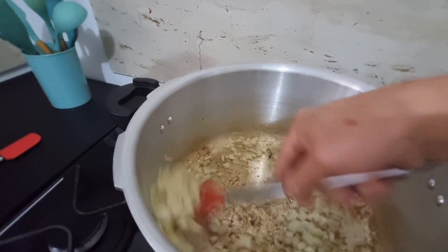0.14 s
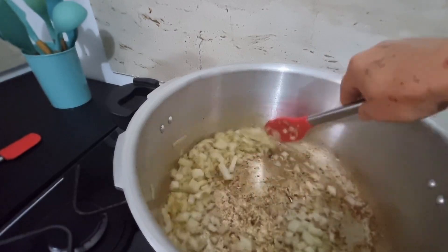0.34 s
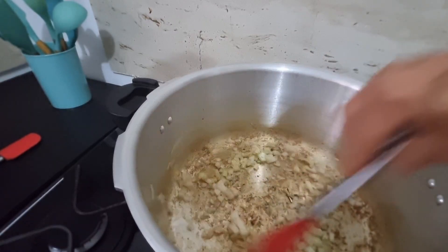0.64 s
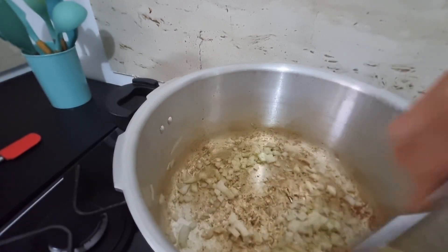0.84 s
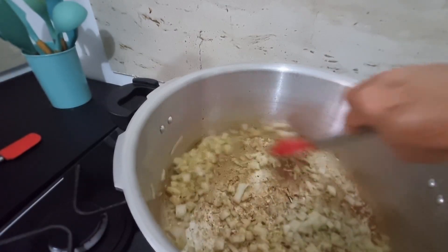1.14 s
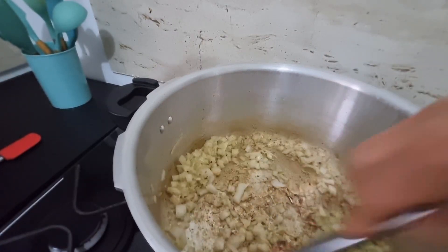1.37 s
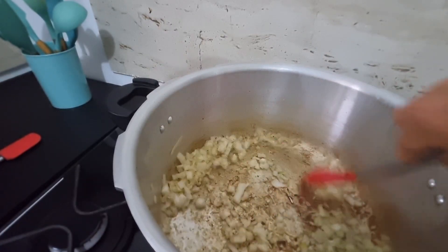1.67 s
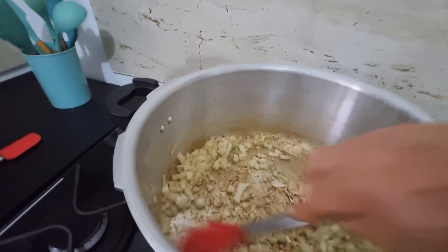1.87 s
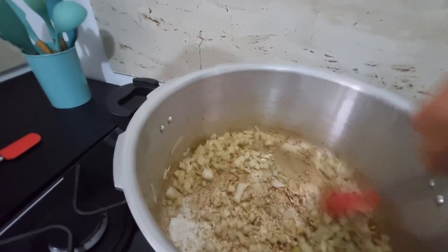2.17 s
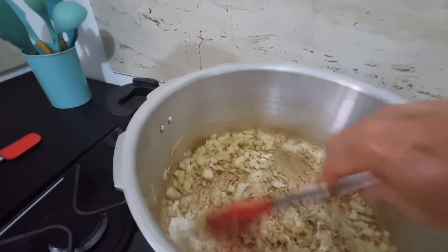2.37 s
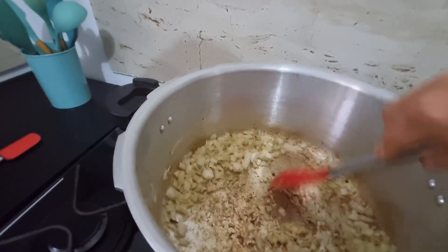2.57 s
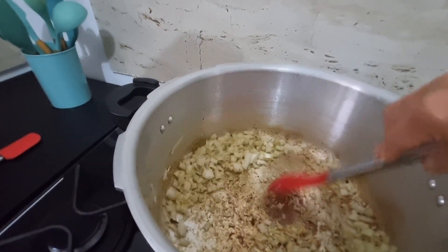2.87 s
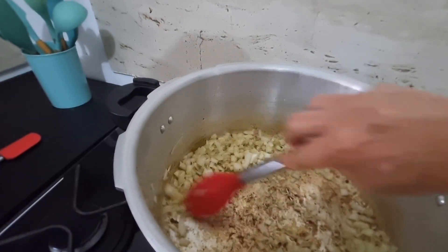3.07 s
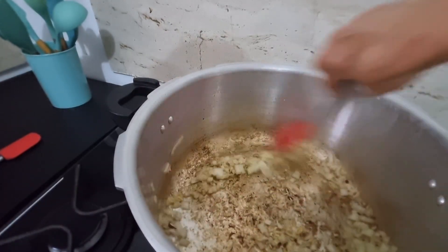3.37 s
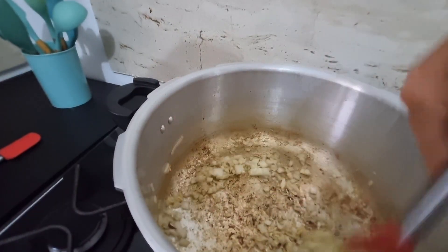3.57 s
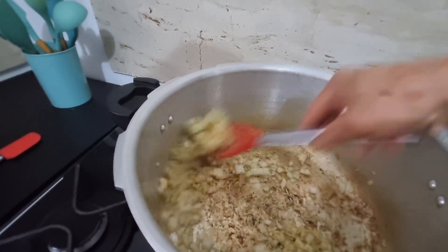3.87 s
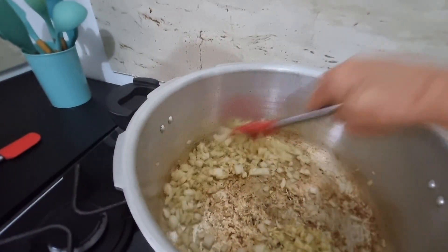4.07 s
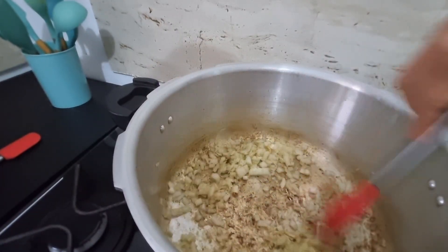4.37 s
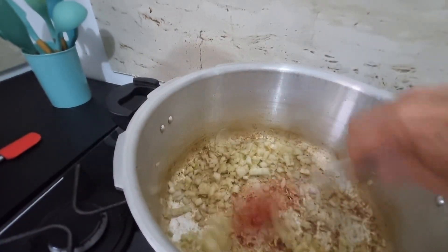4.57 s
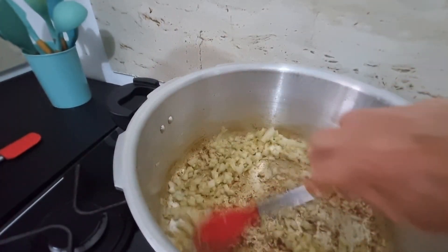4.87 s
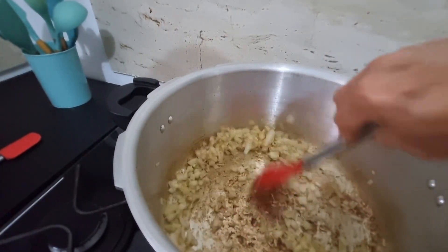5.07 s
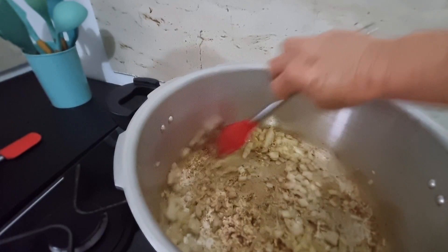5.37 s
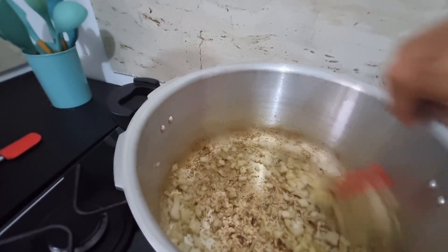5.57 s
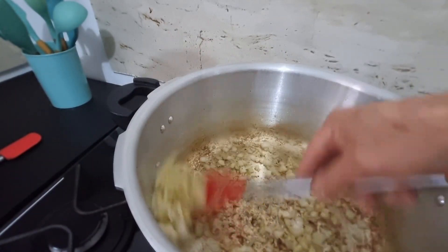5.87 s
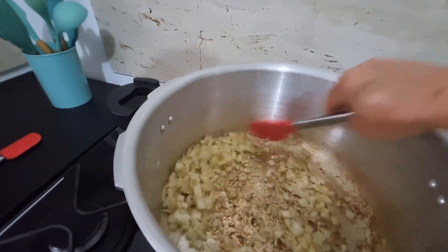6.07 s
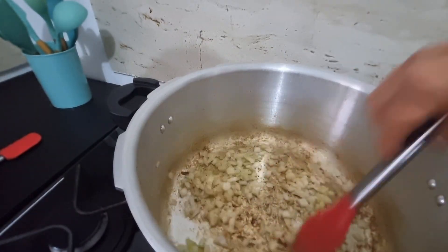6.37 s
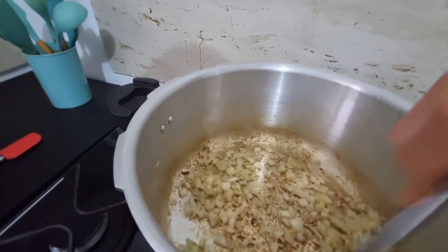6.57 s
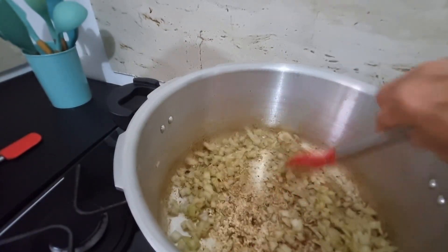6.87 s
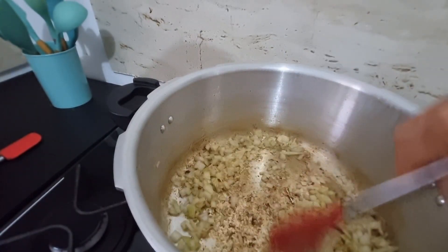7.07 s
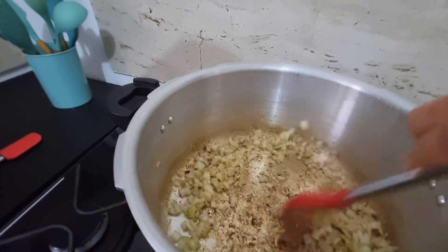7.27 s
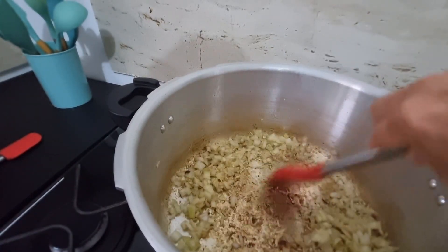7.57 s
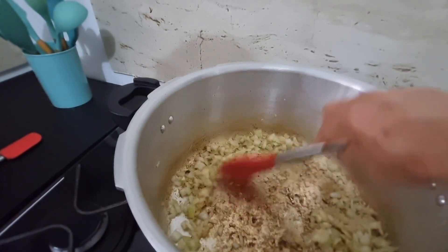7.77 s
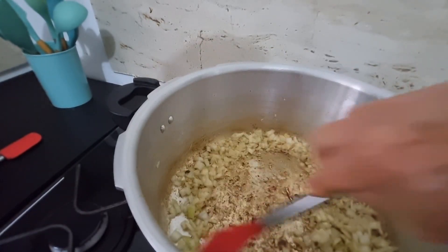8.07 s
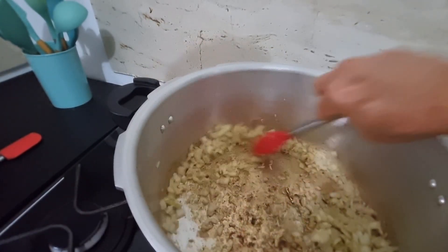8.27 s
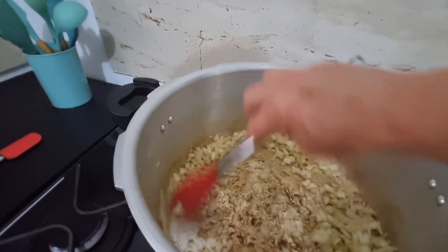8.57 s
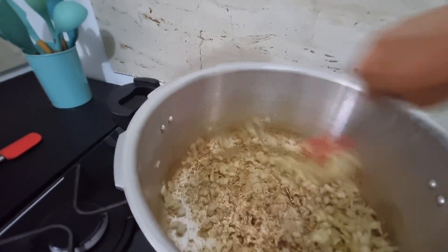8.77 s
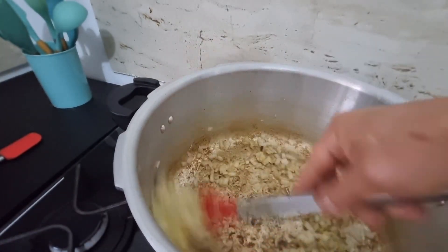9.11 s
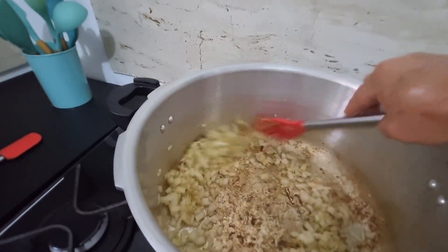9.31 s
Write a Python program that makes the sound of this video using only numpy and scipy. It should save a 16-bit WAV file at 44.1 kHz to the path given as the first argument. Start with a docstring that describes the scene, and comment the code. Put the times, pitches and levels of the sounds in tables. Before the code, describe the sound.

Chopped onion and garlic fry in hot oil in a wide metal pot, heard close up in a kitchen. The dense, bright hiss runs throughout and swells with each stroke of a soft spatula. Small sharp pops and faint plops of turned food dot the sizzle. The spatula rubs and lightly taps the pot in several short clusters, making it ring softly, while a low drone sits underneath.

```python
"""Chopped onion and garlic sizzle in hot oil in a wide aluminium pot, heard close up in stereo.
Countless steam bubbles burst into a dense hiss that swells with each stroke of a soft spatula.
Water drops pop and turned food plops. The pot hums in its own resonances, louder when the spatula
rubs or bumps it, and a low drone fills the kitchen."""
import sys
import numpy as np
from scipy import signal
from scipy.fft import rfft, irfft, next_fast_len
from scipy.io import wavfile
from scipy.ndimage import uniform_filter1d, map_coordinates

SR = 44100
rng = np.random.default_rng(int(sys.argv[2]) if len(sys.argv) > 2 else 0)


def transcribe(signal):
    """Save signal, clipped to [-1, 1], as a 16-bit WAV file at the path in sys.argv[1]."""
    frames = np.atleast_2d(signal).T
    limited = np.clip(frames, -1, 1)
    pcm = np.round(limited * 32767).astype(np.int16)
    wavfile.write(sys.argv[1], SR, pcm)


N = 416304
TIME_S = np.arange(N) / SR
TOP_HZ = 15800


def amp(db):
    """Gain of a level in dB."""
    return 10 ** (np.asarray(db) / 20)


def unit(x):
    """Scale so the mean of the channels has rms 1."""
    return x / np.sqrt(np.mean(np.atleast_2d(x).mean(0) ** 2) + 1e-20)


def along(points, hz):
    """Interpolate (Hz, value) points on a log axis."""
    point_hz, values = np.transpose(points)
    return np.interp(np.log(hz + 1), np.log(point_hz + 1), values)


def curves(rows):
    """One value per sample for each column after the time."""
    times_s, *columns = np.transpose(rows)
    return [np.interp(TIME_S, times_s, column) for column in columns]


def wobble(knots_per_s):
    """Smooth random curve, deviation about 1."""
    knots = rng.standard_normal(int(N * knots_per_s / SR) + 4)
    return map_coordinates(knots, [TIME_S * knots_per_s])


def filtered(x, response):
    """Apply a complex frequency response."""
    size = next_fast_len(N + SR // 2)
    return irfft(rfft(x, size) * response(np.fft.rfftfreq(size, 1 / SR)), size)[..., :N]


def panned(pan_db):
    """Stereo gains; pan is left over right."""
    return amp(np.vstack([pan_db / 2, -pan_db / 2]))


def mid_side(correlation):
    """Mid and side gains for a left-right correlation."""
    angle = np.arccos(np.clip(correlation, -1, 1)) / 2
    return np.array([np.cos(angle), np.sin(angle)])


def noise_pair(correlation):
    """Two correlated white noises."""
    mid, side = mid_side(correlation)[:, None] * rng.standard_normal((2, N))
    return np.array([mid + side, mid - side])


def bubbles(per_s, low_hz, high_hz, cycles, spread_db, samples):
    """Bursting bubbles: damped sines, most weak, a few strong."""
    when, pitch, size = np.hsplit(rng.random((int(per_s * N / SR), 3)), 3)
    t = np.arange(samples) / SR
    hz = low_hz * (high_hz / low_hz) ** pitch
    strength = amp(spread_db * np.minimum(-np.log(1 - size), 5))
    rings = strength * np.sqrt(hz) * np.sin(2 * np.pi * hz * t) * np.exp(-hz * t / cycles)
    index = (when * N).astype(int) + np.arange(samples)
    return unit(np.bincount(index.ravel(), rings.ravel(), N + samples)[:N])


# Each row: frequency in Hz, left-right correlation of the boiling.
BOIL_CORRELATION = [(1100, 0.34), (1500, 0.28), (1800, -0.23), (2050, -0.046), (2300, -0.16), (3300, -0.14),
                    (3800, -0.028), (6300, 0.1), (7200, -0.19), (8000, 0.04)]


def boiling():
    """Near bubbles on the hiss of far ones, fluttering in patches of time and frequency."""
    near = np.array([bubbles(5000, 1680, 13700, cycles=1.15, spread_db=2.5, samples=40) for _ in range(2)])
    wet = np.array([bubbles(500, 1474, 6045, cycles=15, spread_db=3, samples=260) for _ in range(2)])
    far = rng.standard_normal((2, N))
    spectra = signal.stft(far + amp(-11) * near + amp(-16.5) * wet, nperseg=512)[2]
    patches = uniform_filter1d(rng.standard_normal(spectra.shape), 12, axis=1)
    patches = uniform_filter1d(patches, 9, axis=2)
    patchy = signal.istft(spectra * amp(1.05 * patches / patches.std()), nperseg=512)[1][:, :N]
    mid, side = filtered(patchy, lambda hz: mid_side(along(BOIL_CORRELATION, hz)))
    flutter_db = 0.13 * wobble(14) + 0.33 * wobble(45)
    return np.array([mid + side, mid - side]) * amp(flutter_db)


# Sizzle spectrum per side. Each row: frequency in Hz, relative density in dB.
LEFT_SPECTRUM = [(900, -41.5), (1300, -19), (2400, -18.5), (3100, -13.5), (4200, -7.5), (6000, -4.5),
                 (7300, -1.5), (8300, -7.5), (9300, -5), (10800, -3), (12000, 1.5), (14000, 1),
                 (15700, 0.5)]
RIGHT_SPECTRUM = [(900, -33.5), (1300, -20.5), (2500, -16), (3800, -7.5), (5300, -2), (6100, -3.5),
                  (7500, 4.5), (7900, 5.5), (8700, -1), (10800, 5), (11700, 2), (12800, 7), (15700, 8.5)]
# Air resonances in the pot. Each row: centre in Hz, width in Hz, lift in dB.
AIR_MODES = [(1305, 22, 9.5), (1820, 79, 2), (2180, 94, 2.5), (2590, 150, 1.5), (3110, 130, 2)]


def sizzle_colour(hz):
    """Stereo gain of the sizzle, lifted where the air in the pot resonates."""
    lift_db = sum(db / (1 + (2 * (hz - centre) / width) ** 2) for centre, width, db in AIR_MODES)
    return amp([along(LEFT_SPECTRUM, hz) + lift_db, along(RIGHT_SPECTRUM, hz) + lift_db]) * (hz < TOP_HZ)


# Strokes turn the food. Each row: time in seconds, fizz level in dB, fine steam level in dB.
STROKES = [(0.0, -30, -32.5), (0.23, -31, -32.5), (0.29, -25.5, -30), (0.37, -24.5, -30), (0.52, -28, -33),
           (0.66, -32.5, -32), (1.02, -31, -32), (1.18, -27, -27), (1.45, -30.5, -33.5),
           (1.68, -28.5, -29.5), (2.02, -29, -33), (2.16, -25.5, -27.5), (2.34, -29, -33.5),
           (2.5, -28, -30), (3.1, -29.5, -33), (3.21, -30, -32), (3.39, -25, -29.5), (3.84, -32, -33.5),
           (4.05, -25.5, -30), (4.55, -29.5, -32.5), (4.73, -26, -28), (4.89, -29, -31.5),
           (5.12, -26, -29.5), (5.23, -29, -31.5), (5.52, -27, -29), (5.86, -34, -34.5), (6.05, -28, -32.5),
           (6.52, -32.5, -30), (6.7, -31.5, -35), (6.78, -28.5, -29.5), (7.28, -28, -30),
           (7.39, -29.5, -32), (7.54, -29, -30), (7.76, -31.5, -34), (7.86, -26.5, -30), (8.15, -31.5, -34),
           (8.31, -27.5, -31.5), (8.57, -29.5, -31.5), (8.75, -26.5, -28.5), (8.88, -29, -31.5),
           (9.18, -34.5, -34), (9.44, -26.5, -30.5)]


def stroke_swell_db():
    """Swell of the fizz about its mean as the food is turned."""
    fizz_db = curves(STROKES)[0]
    return fizz_db - fizz_db.mean()


# Slow drift. Each row: time in seconds, large bubbles over fizz in dB, pan in dB (mean is removed).
DRIFT = [(0, -8, -8), (.35, -10.5, -8), (.9, -10, -8), (1.5, -11.5, -6), (2.0, -10.5, -7), (2.5, -10, -7),
         (3.1, -12, -5.5), (3.4, -10.5, -6), (3.7, -10, -6), (4.1, -11, -8), (4.7, -9.5, -5.5),
         (5.4, -10, -6.5), (6.1, -10, -7.5), (6.8, -10, -7.5), (7.1, -10, -6.5), (7.9, -11.5, -6),
         (8.3, -11, -7), (9.0, -9.5, -7), (9.44, -13, -8)]
# Wet food meets hot metal, large bubbles surge. Each row: peak time in seconds, lift in dB.
SURGES = [(.03, 2), (.55, 4.5), (3.39, 2.5), (3.56, 2.5), (4.57, 2.5), (5.47, 2.5), (6.26, 2.5), (7.39, 1),
          (8.76, 1)]
SURGE_HALF_S, LARGE_SWELL_SHARE, PAN_PER_SWELL = 0.052, 0.54, -0.096


def sizzle():
    """Water boils out of the food in three bands: large bubbles low, fizz above, fine steam on top."""
    fizz_db, steam_db = curves(STROKES)
    offset_db, pan_db = curves(DRIFT)
    swell_db = stroke_swell_db()
    large_db = fizz_db + offset_db + (LARGE_SWELL_SHARE - 1) * swell_db + 0.96 * wobble(6)
    large_db += sum(db * np.exp(-((TIME_S - s) / SURGE_HALF_S) ** 2) for s, db in SURGES)
    pan_db += PAN_PER_SWELL * swell_db + 0.5 * wobble(4)
    boil = boiling()
    lowpass = lambda hz, edge_hz: 1 / (1 + (hz / edge_hz) ** 8)
    large = filtered(boil, lambda hz: sizzle_colour(hz) * lowpass(hz, 4064))
    fizz = filtered(boil, lambda hz: sizzle_colour(hz) * (lowpass(hz, 9310) - lowpass(hz, 4400)))
    steam = filtered(boil, lambda hz: sizzle_colour(hz) * (1 - lowpass(hz, 11600)))
    bands = amp(large_db) * unit(large) + amp(fizz_db) * unit(fizz) + amp(steam_db) * unit(steam)
    return bands * panned(pan_db - pan_db.mean())


# Each row: peak time in seconds, level in dB, pitch in Hz, pan in dB.
WATER_POPS = [(.929, -17, 9000, 4), (1.291, -11, 9000, 2), (1.384, -16, 8000, -2), (3.186, -28, 8000, -5),
              (4.078, -13, 8000, 5), (4.464, -18, 8000, -10), (4.5656, -16.5, 3200, -10),
              (6.035, -19, 8000, 4), (6.596, -24, 8000, -10), (6.775, -27, 2200, 0), (7.858, -13, 8000, -6),
              (8.742, -16, 7600, -12)]


def pops():
    """Water drops burst in the oil: a few cycles at a pitch set by bubble size."""
    out, t = np.zeros((2, N + SR)), np.arange(-40, 120) / SR
    for s, db, hz, pan_db in WATER_POPS:
        width_cycles = np.where(t < 0, .5, 1.7)
        crack = np.sin(2 * np.pi * (hz * t + rng.random())) * np.exp(-(hz * t / width_cycles) ** 2)
        out[:, round(s * SR) - 40:][:, :len(t)] += amp(db) * panned(pan_db) * crack
    return out[:, :N]


# Each row: peak time in seconds, level in dB.
FOOD_PLOPS = [(0.297, -45), (0.491, -39), (1.453, -37), (1.705, -43), (2.725, -38), (3.009, -39),
              (3.07, -41), (3.317, -36), (3.45, -42), (5.633, -41), (5.85, -37), (5.878, -41), (5.938, -37),
              (6.202, -39), (6.585, -38), (7.344, -43.9), (7.616, -42), (7.878, -40), (8.395, -40),
              (8.802, -38), (8.957, -41), (9.386, -40)]
FAINT_PLOP_COUNT, FAINT_PLOP_DB = 20, -53


def plops():
    """Turned food lands, each plop one soft low cycle; faint ones fall at random."""
    out, t = np.zeros(N + SR), np.arange(-400, 400) / SR
    faint = [(0.14 + when * (N / SR - .2), FAINT_PLOP_DB + 6 * (size - .5))
             for when, size in rng.random((FAINT_PLOP_COUNT, 2))]
    for s, db in FOOD_PLOPS + faint:
        hz = 230 * np.exp(0.17 * rng.standard_normal())
        envelope = amp(db - 11.5 * (t / 0.0031) ** 2)
        out[round(s * SR) - 400:][:len(t)] += envelope * np.sin(2 * np.pi * hz * t)
    return np.array([out[:N] * amp(1.2), np.roll(out[:N], 30)])  # left is louder and earlier


# Spatula on the pot floor. Each row: the two bounds of a span in seconds.
CONTACT_SPANS = [(1.05, 1.4), (3.29, 3.8), (6.282, 6.7), (8.66, 8.1)]
CATCH_PER_S, CATCH_DB, CATCH_HZ, CATCH_S = 10, -41, 414, 0.013


def spatula_catches():
    """The spatula catches faintly at random, at least once a span; returns rows like DRAGS."""
    rows = []
    for start_s, end_s in CONTACT_SPANS:
        count = max(1, round(CATCH_PER_S * (end_s - start_s)))
        for when, force, pitch, rise in rng.random((8, 4))[:count]:
            rows.append((start_s + (end_s - start_s) * when, CATCH_DB + 5 * (force - .5),
                         CATCH_HZ + 20 * (pitch - .5), CATCH_S * (.5 + rise), CATCH_S))
    return rows


# Each row: peak time in seconds, level in dB, pitch in Hz, rise and fall in seconds.
DRAGS = [(0.389, -40, 423, 0.0068, 0.0063), (1.34, -35, 430, .008, .011), (1.838, -39, 422, 0.0066, .007),
         (1.952, -41, 420, .014, 0.013), (2.398, -41, 423, .013, .007), (2.462, -29, 408, 0.025, .011),
         (2.491, -28.5, 413, 0.008, 0.016), (2.549, -38, 424, 0.012, 0.015),
         (2.651, -31.5, 422, .007, 0.021), (2.699, -28, 430, 0.0039, 0.0096),
         (2.791, -32.5, 405, 0.013, .008), (2.833, -32.5, 408, .012, .019), (2.965, -41, 414, .028, .008),
         (2.989, -32.5, 423, .008, .013), (3.563, -41, 410, .01, 0.013), (4.28, -38, 422, 0.0089, .013),
         (4.334, -38, 424, .012, 0.018), (4.624, -22.5, 410, 0.0081, 0.012),
         (4.665, -30.5, 405, 0.0098, 0.025), (4.775, -32, 414, 0.012, 0.0062),
         (4.803, -29, 413, .009, 0.01), (4.825, -28.5, 414, 0.0055, .013), (4.87, -35.5, 421, .009, 0.033),
         (5.02, -41, 417, .053, .044), (5.147, -41.5, 423, 0.0088, .015), (5.19, -39.5, 422, .012, 0.014),
         (5.226, -41, 406, .006, .009), (5.422, -36.5, 418, 0.021, 0.0055),
         (6.417, -38.5, 422, 0.0074, .009), (6.721, -37.5, 426, .011, 0.013),
         (6.785, -33, 427, 0.015, 0.007), (6.81, -34.5, 409, .01, 0.022), (7.003, -25, 420, .021, 0.011),
         (7.056, -38, 413, 0.0088, 0.018), (7.17, -26.5, 421, 0.031, 0.041),
         (7.291, -36.4, 424, 0.0097, 0.011), (7.345, -24, 415, 0.0036, 0.015),
         (7.485, -34, 428, 0.0079, .01), (7.51, -35, 420, 0.0076, .008), (7.651, -28, 420, .007, .014),
         (7.7, -29.5, 420, 0.0067, 0.018), (7.787, -34, 403, 0.015, 0.034), (8.016, -37, 422, .014, .011),
         (8.051, -32, 423, 0.013, 0.009), (8.09, -35, 422, .01, .013), (8.429, -41, 415, 0.017, 0.013),
         (8.71, -38, 410, 0.017, .009)]


def spatula_drags():
    """Drags on the pot floor swell a low mode; returns the sound and the rubbing envelope."""
    out, pressure = np.zeros((2, N + SR)), np.zeros(N + SR)
    t = np.arange(-SR // 8, SR // 8) / SR
    for s, db, hz, rise_s, fall_s in DRAGS + spatula_catches():
        envelope = amp(db - 5.1 * (t / np.where(t < 0, rise_s, fall_s)) ** 2)
        phase = rng.random()
        lead = 0.046 * rng.standard_normal() * np.array([[1], [-1]])  # contact moves around the pot
        start = round(s * SR) - SR // 8
        out[:, start:][:, :len(t)] += envelope * np.sin(2 * np.pi * (hz * t + phase + lead))
        pressure[start:][:len(t)] += envelope
    slip = amp(wobble(60))  # rubber slips unevenly on metal
    rubbing = uniform_filter1d(pressure[:N], size=2500)  # starts before a drag and outlasts it
    return out[:, :N] * slip * panned(5.4), rubbing


# Pot resonances. Each row: centre in Hz, width in Hz, relative gain in dB.
POT_LOW_MODES = [(222.6, 9.1, -12.5), (337.3, 22, -8.5), (408.3, 30.5, -1.5), (431.4, 32, -2),
                 (469, 49, -10), (585, 17.7, -11.5), (688, 48, -16.5)]
POT_HIGH_MODES = [(767, 49, 1.2), (857.5, 58, 9.9), (897, 54, 8.7), (1006, 54, 1.5)]
# Hum of the high modes. Each row: time in seconds, base level in dB.
HIGH_HUM = [(0, -56), (.9, -55.5), (1.5, -52.5), (2.3, -55), (3.0, -61), (3.6, -58.5), (4.8, -56.5),
            (5.6, -54.5), (6.5, -58), (7.4, -55), (8.1, -56.5), (8.8, -53.5), (9.44, -56)]
LOW_HUM_DB, HUM_SWELL_SHARE = -51.5, 0.48


def pot_hum(modes, correlation, pan_db):
    """Noise rings a set of pot resonances of alternating sign."""
    def response(hz):
        return sum((-1) ** k * amp(db) * 1j * hz * width / (centre ** 2 - hz ** 2 + 1j * hz * width)
                   for k, (centre, width, db) in enumerate(modes))
    return unit(filtered(noise_pair(correlation), response) * panned(pan_db))


def pot():
    """Frying keeps the pot humming; the spatula adds its drags and roughens all modes."""
    swell_db = HUM_SWELL_SHARE * stroke_swell_db()
    low_db = LOW_HUM_DB + swell_db + 1.5 * wobble(4)
    high_db = curves(HIGH_HUM)[0] + swell_db + 0.82 * wobble(6)
    drags, rubbing = spatula_drags()
    low = (amp(low_db) + 0.13 * rubbing) * pot_hum(POT_LOW_MODES, correlation=0.84, pan_db=2)
    high = (amp(high_db) + 0.078 * rubbing) * pot_hum(POT_HIGH_MODES, correlation=0.32, pan_db=-1.2)
    return low + high + drags


# Each row: time in seconds, level in dB.
WALL_TAPS = [(2.493, -36), (2.693, -40.8), (4.623, -39), (4.64, -45), (4.866, -35), (5.422, -32.5),
             (5.468, -30.5), (6.777, -32), (6.801, -33), (6.822, -38.8), (7.012, -41), (7.178, -37.0),
             (7.345, -46)]
TAP_RISE_S, TAP_T60_S = 0.0023, 0.063


def spatula_taps():
    """The spatula's edge taps the wall and rings the high modes."""
    out, t = np.zeros(N + SR), np.arange(SR // 10) / SR
    envelope = amp(-60 * t / TAP_T60_S) * (1 - np.exp(-t / TAP_RISE_S))
    for s, db in WALL_TAPS:
        ring = envelope * sum(amp(mode_db + rng.normal(0, 1.9)) * np.sin(2 * np.pi * hz * t)
                              for hz, _, mode_db in POT_HIGH_MODES)
        out[round((s - .003) * SR):][:len(t)] += amp(db) * ring / np.abs(ring).max()
    return out[:N] * panned(-3.8)


# Each row: time in seconds, level in dB.
LOWER_TONE = [(0.0, -65), (0.47, -62), (0.55, -72), (1.18, -39), (1.31, -47), (2.02, -40.5), (2.42, -47),
              (2.68, -33.5), (2.84, -40), (2.94, -48), (3.34, -36), (3.73, -40), (3.92, -48), (4.05, -41),
              (4.44, -50), (4.52, -43), (5.12, -75), (5.36, -57), (6.28, -69), (6.36, -57), (8.28, -72),
              (8.49, -45), (9.02, -44), (9.15, -49), (9.25, -44), (9.44, -53)]
# Upper tone swells, perhaps the stove shaken by stirring. Each row: peak time in seconds, level in dB.
UPPER_THROBS = [(.29, -51), (.71, -44), (.94, -45), (2.2, -49), (2.71, -44), (2.94, -41), (3.12, -44),
                (3.3, -44), (3.94, -40), (4.36, -49), (4.49, -40), (4.73, -38), (5.5, -49), (5.99, -45),
                (6.39, -47), (6.76, -50), (7.2, -44), (7.46, -45), (8.0, -58), (9.2, -50)]
UPPER_BASE_DB, THROB_HALF_S = -51, 0.058
# Each row: time in seconds, rumble level in dB, air level in dB.
ROOM_LEVELS = [(0, -52, -51.5), (.6, -48, -57), (1.6, -64, -55), (2.05, -58, -58), (2.13, -46, -51),
               (2.3, -56, -63), (3.2, -48, -61), (3.7, -58, -56), (3.8, -53, -58.5), (5, -49.5, -61),
               (6.3, -57, -58), (6.7, -48.5, -56), (7.3, -51, -62), (8.15, -63, -58), (8.35, -53, -56),
               (9.44, -60, -61)]
# Each row: frequency in Hz, relative density in dB.
RUMBLE_SPECTRUM = [(62, -42), (70, -5), (77, 2.5), (86, -5), (97, -8.5), (110, -8.5), (130, -48)]
AIR_SPECTRUM = [(18, -12), (30, 1), (45, -7), (110, 0), (160, 0), (280, -5.5), (540, -25), (1100, -14),
                (1500, -45)]


def kitchen_drone():
    """Two wavering low tones and a rumble over the quiet air of the kitchen."""
    def tone(hz, drift_hz):
        phase = 2 * np.pi * np.cumsum(hz + drift_hz * wobble(3.7)) / SR
        return np.sqrt(2) * np.sin(phase + [[0], [.2]])

    def noise(spectrum, correlation):
        return unit(filtered(noise_pair(correlation), lambda hz: amp(along(spectrum, hz))))

    lower_gain = amp(curves(LOWER_TONE)[0])
    upper_gain = amp(UPPER_BASE_DB + 2.8 * wobble(5))
    upper_gain += sum(amp(db - 10 * ((TIME_S - s) / THROB_HALF_S) ** 2) for s, db in UPPER_THROBS)
    tones = lower_gain * tone(46.5, drift_hz=0.56) + upper_gain * tone(59.8, drift_hz=1.0)
    rumble_db, air_db = curves(ROOM_LEVELS)
    rumble = amp(rumble_db + 2.8 * wobble(5)) * noise(RUMBLE_SPECTRUM, correlation=0.98)
    air = amp(air_db + 1.1 * wobble(6.5)) * noise(AIR_SPECTRUM, correlation=0.68)
    return (tones + rumble) * panned(4.5) + air


def scene():
    """Stereo mix of food, pot and kitchen."""
    return sizzle() + pops() + plops() + pot() + spatula_taps() + kitchen_drone()


def record(dry):
    """Brick-wall low-pass at TOP_HZ."""
    return filtered(dry, lambda hz: hz < TOP_HZ)


dry = scene()
out = record(dry)
transcribe(out)
```